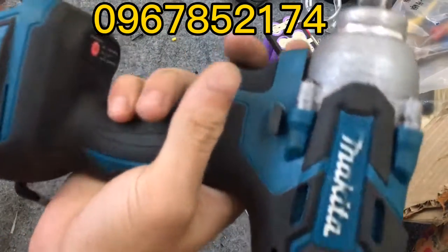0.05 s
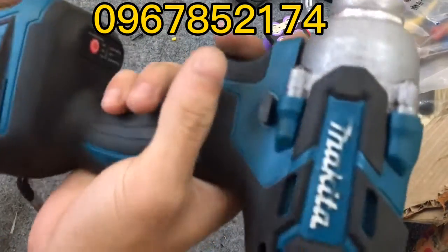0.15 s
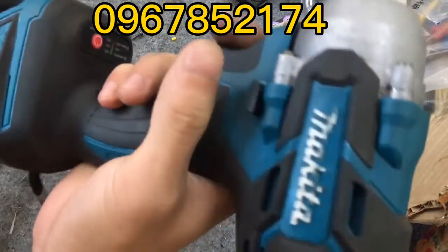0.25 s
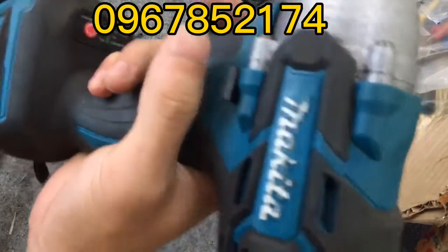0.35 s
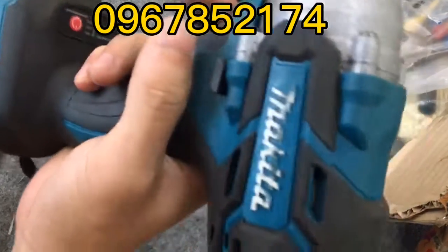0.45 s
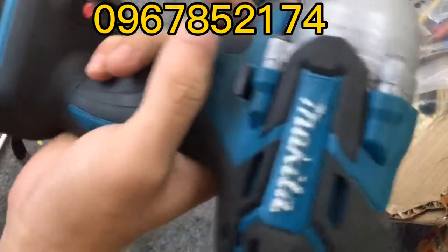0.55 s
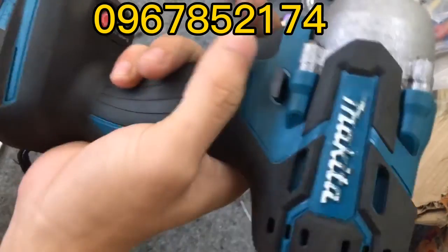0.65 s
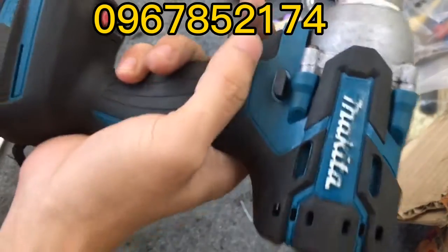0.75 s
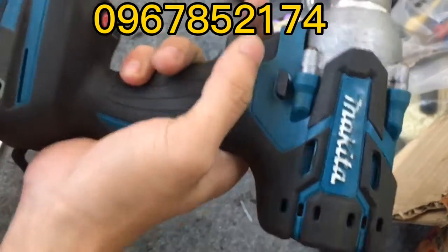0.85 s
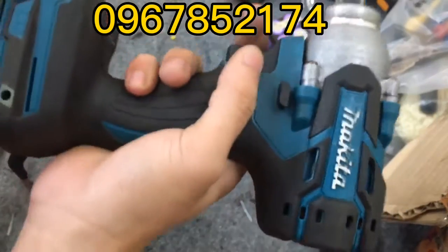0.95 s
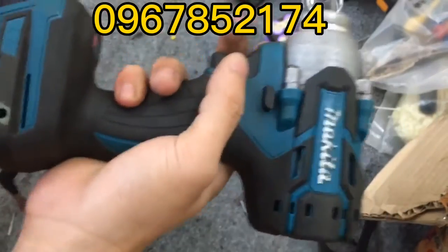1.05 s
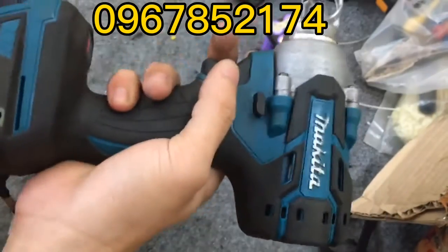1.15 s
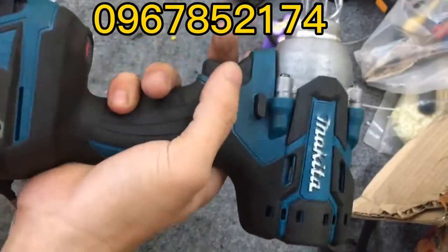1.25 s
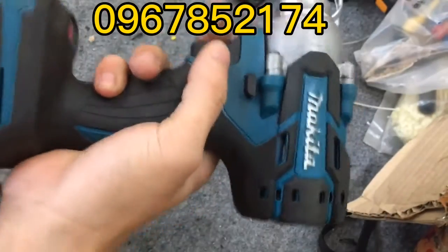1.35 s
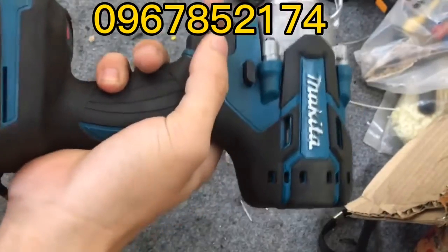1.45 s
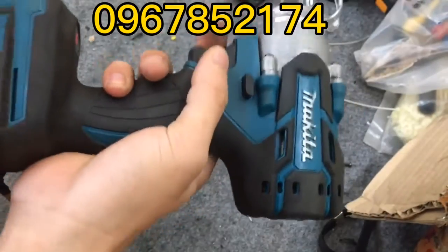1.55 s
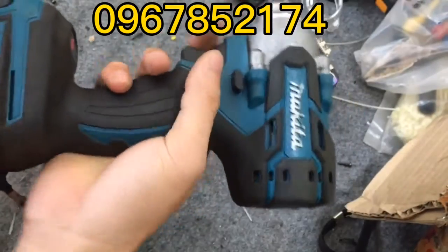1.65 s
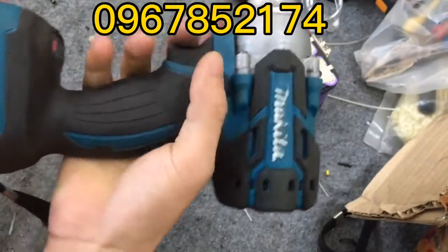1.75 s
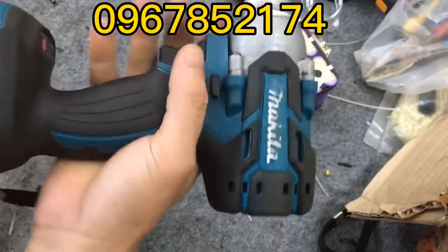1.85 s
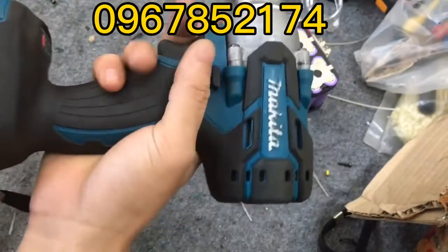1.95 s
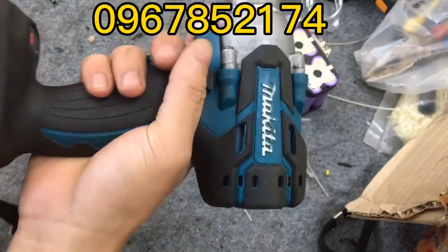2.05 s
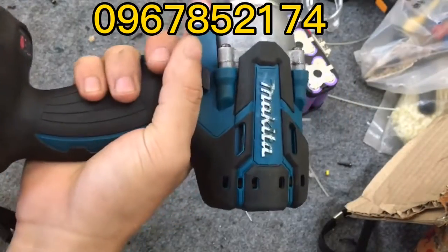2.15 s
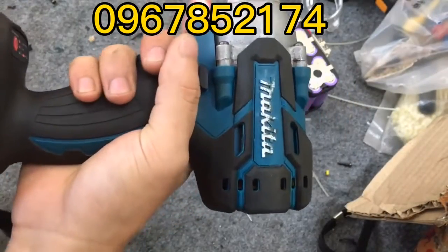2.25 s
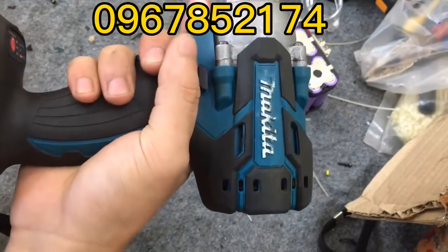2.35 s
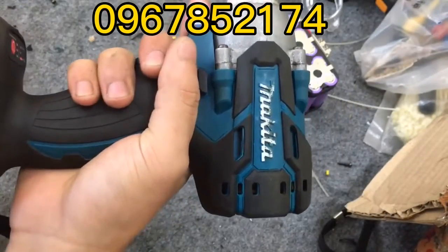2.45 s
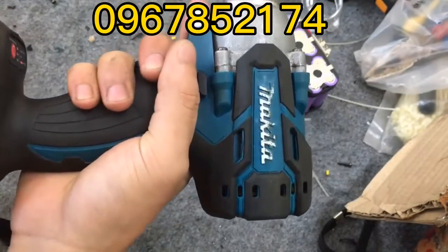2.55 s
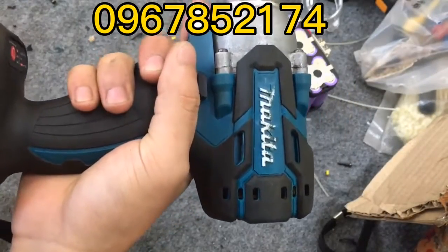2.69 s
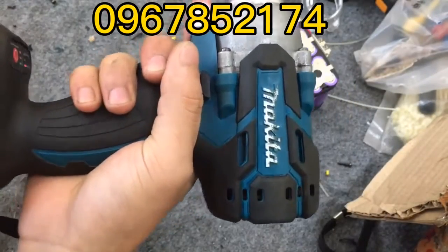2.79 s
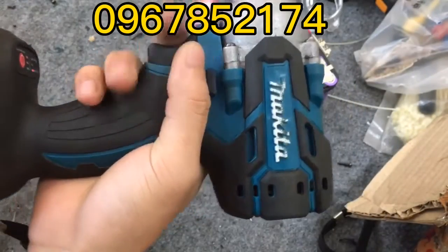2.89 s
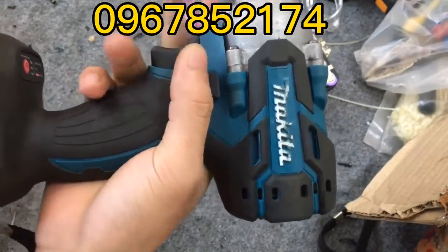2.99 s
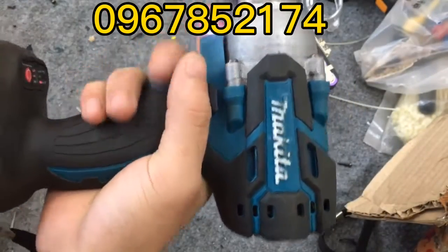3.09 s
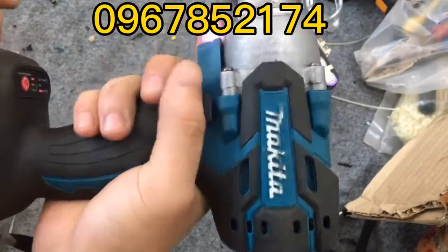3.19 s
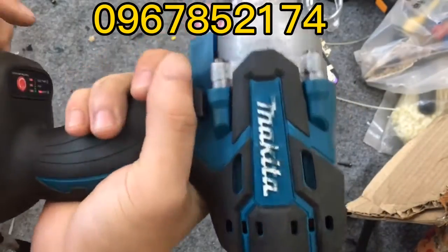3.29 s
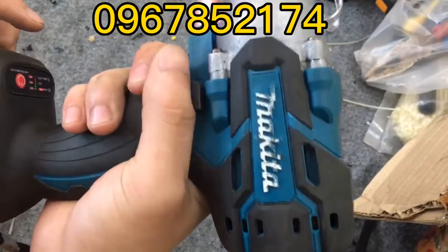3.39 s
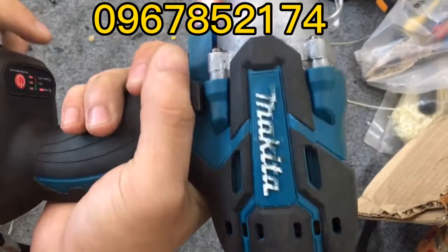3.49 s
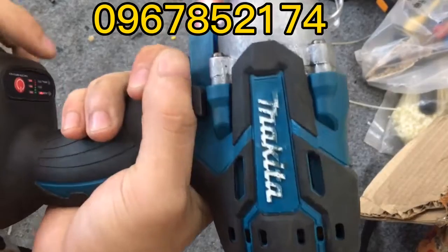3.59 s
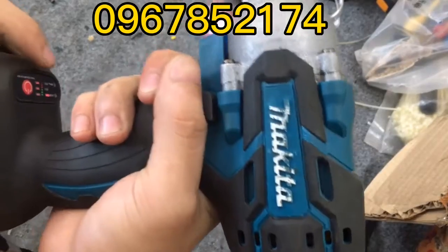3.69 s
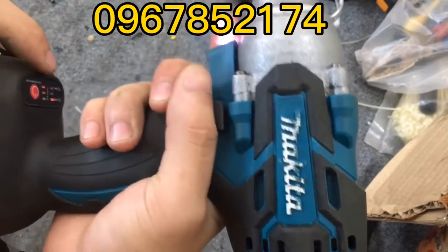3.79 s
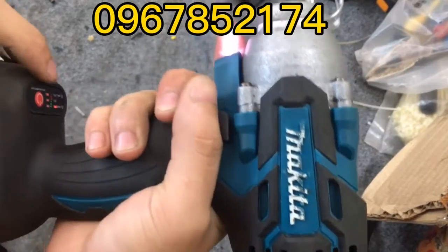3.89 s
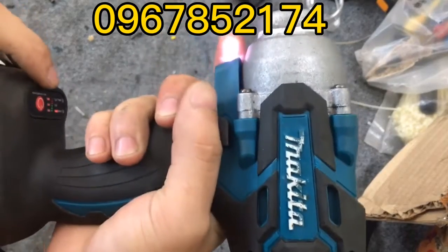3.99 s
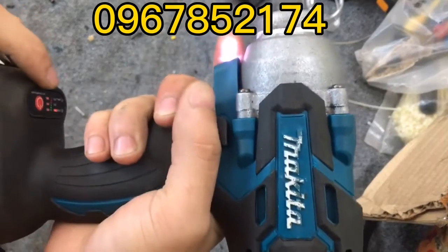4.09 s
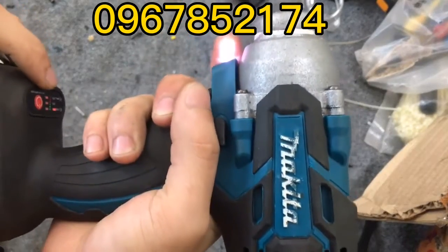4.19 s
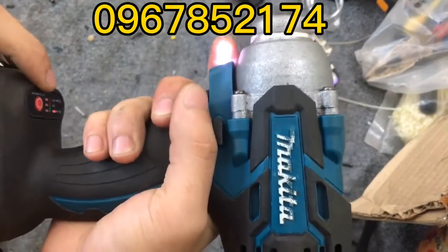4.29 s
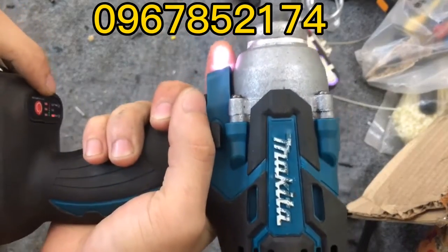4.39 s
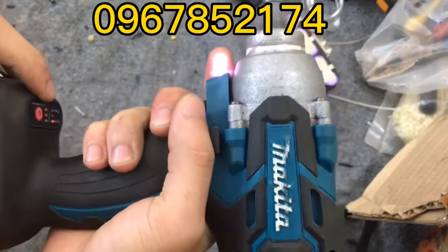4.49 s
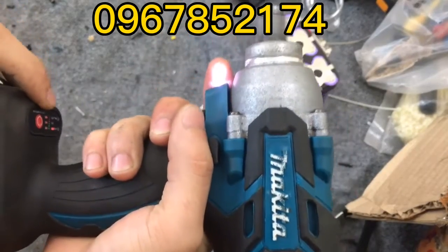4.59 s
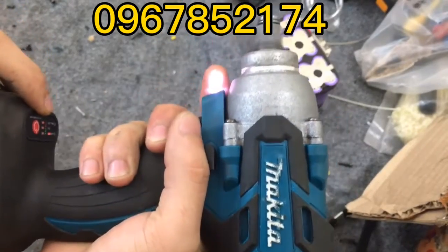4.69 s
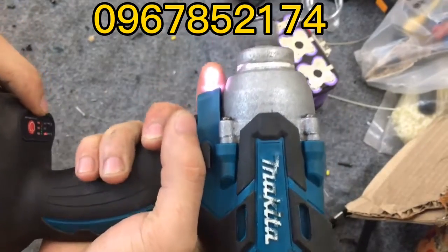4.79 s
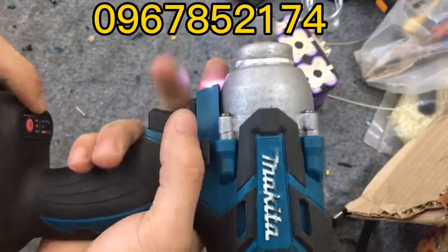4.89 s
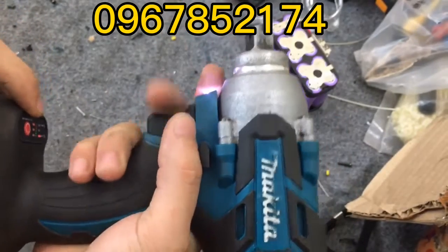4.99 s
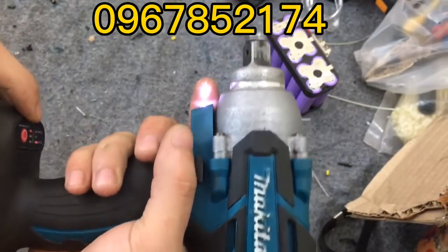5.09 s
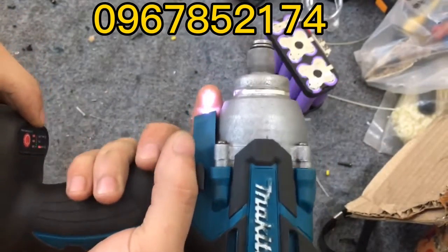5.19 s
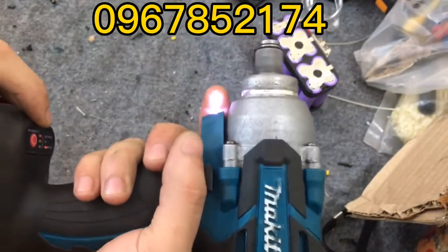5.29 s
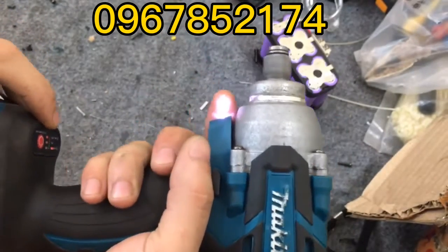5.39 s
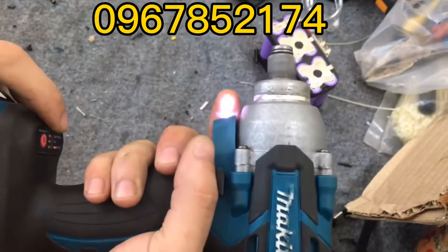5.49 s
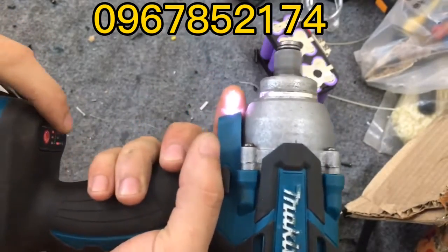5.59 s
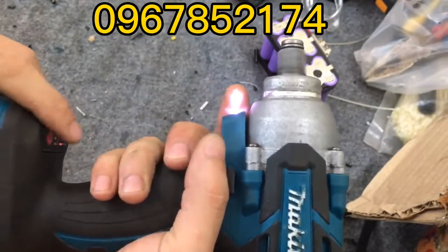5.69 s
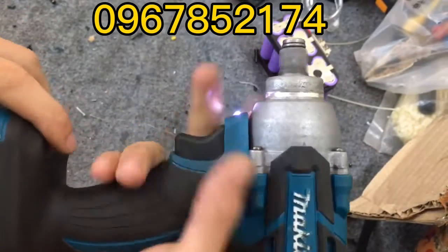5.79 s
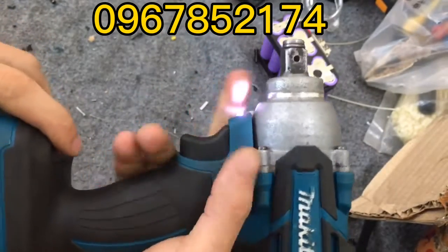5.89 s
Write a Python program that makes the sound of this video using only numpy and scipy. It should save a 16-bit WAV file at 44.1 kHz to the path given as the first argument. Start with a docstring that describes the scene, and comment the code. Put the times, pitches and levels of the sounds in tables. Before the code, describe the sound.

A close, centred take of a cordless impact wrench in a workshop, over low hum, rumble and soft hiss. From 0.42 to 0.61 s a rapid cluster of hard plastic snaps rings briefly in the housing, with small brushes and a bump. A louder, tight burst of snaps comes at 1.34-1.36 s, with faint ticks near 1.5 s. From 1.55 s the hand shifts on the grip with dull low thumps. The trigger runs the tool unloaded from 2.14 to 2.96 s, 3.14 to 4.95 s and 5.10 to 5.84 s. Each run begins with quick electric chirps and small clacks, reaches speed in about a tenth of a second, and holds a bright, slightly wavering whine around 2.3 kHz and higher, with rushing fan air and grainy gear rattle. Pitch then drops, the brake chirps, and a loud metallic clack ends it, with slight room tail. A faint click follows at 5.94 s.

```python
"""Cordless impact wrench in a workshop

A hand-held wrench, close up: its direction switch snaps over, then the trigger runs it three times unloaded.
Each run is a chirp of starting current, a whine over fan air and gear rattle, and a braked stop with a clack.
Sines locked to one shaft speed make the whine, filtered noise the air, and random knocks on ringing modes
the rattle. Clicks are noise cracks with a shell ring; hand noises, hum, rumble and hiss lie underneath."""
import sys
import numpy as np
from scipy import signal
from scipy.fft import rfft, irfft
from scipy.io import wavfile
from scipy.ndimage import uniform_filter1d, minimum_filter1d

SR = 44100
rng = np.random.default_rng(int(sys.argv[2]) if len(sys.argv) > 2 else 0)


def wav_record(signal):
    """Record a signal, one row per channel, as 16-bit PCM in the file named by sys.argv[1]."""
    frames = np.transpose(np.atleast_2d(signal))
    bounded = np.clip(frames, -1, 1)
    # unit amplitude maps onto the largest positive 16-bit level
    quanta = np.round(bounded * 32767).astype(np.int16)
    wavfile.write(sys.argv[1], SR, quanta)


N = 262218
TIME = np.arange(N) / SR

# workshop background over time: start_s, low_hum_db, high_hum_db, hiss_and_rumble_db
BACKGROUND = [(0, -46, -41, -35.5), (.5, -41.5, -42.5, -41), (1.2, -41.5, -50.5, -39), (1.9, -49, -54, -40),
              (3.2, -54.5, -44.5, -41), (5.9, -52, -54, -48)]
# the low and the high hum line: pitch_hz
HUM_HZ = (104.8, 164)
# relative spectrum of the rumble and hiss: frequency_hz, density_db (per Hz)
FLOOR_SPECTRUM = [(20, -30), (35, -25), (55, -2.5), (100, -10), (220, -13), (400, -14), (900, -20.5),
                  (2200, -22.5), (5000, -31), (10000, -39), (16000, -45)]
# decay of the room by band: frequency_hz, t60_s
ROOM_T60 = [(100, 0.12), (600, 0.93), (2200, 0.68), (6000, 1), (15000, 0.34)]
# relative spectrum of the room tail at its start: frequency_hz, level_db
ROOM_COLOUR = [(200, -0.5), (600, -7), (870, -1.5), (1300, -2.5), (2100, 1), (4500, -8), (7000, -8.5),
               (15000, -8)]
# relative spectrum of the hand shifting on the grip: frequency_hz, density_db (per Hz)
GRIP_SPECTRUM = [(15, -22), (35, -2), (55, 2.5), (120, -9.5), (200, -5), (400, -16), (1500, -62)]
# a low thud as the switch snaps over (first row), then the hand bumping the grip, levels before a common trim:
# start_s, level_db, centre_hz, length_s
BUMPS = [(.56, -17.5, 230, 0.017), (1.565, -22, 77.4, 0.066), (1.665, -23.5, 150, 0.022),
         (1.968, -15, 221, 0.041), (1.975, -19.5, 75.5, 0.088), (2.68, -22, 84, 0.074),
         (2.86, -21.5, 64.3, 0.081), (3.505, -19, 69, 0.034), (4.095, -18, 130, 0.043), (5, -29, 102, 0.1)]
# fingers and switch sliding on the housing, levels before a common trim: start_s, level_db, centre_hz, length_s
BRUSHES = [(0, -53, 12000, .19), (.367, -32, 13500, .011), (.527, -28, 670, .03), (.527, -34, 3000, .035),
           (.95, -45.5, 9300, .11), (1.95, -52, 8300, .085)]
# snaps of switch and trigger: start_s, level_db, shell_ring_db, tilt_db_per_octave, shell_pitch_ratio
SNAPS = [(0.423, -5.5, 11, -1, 1.07), (.4305, -9, 10, -0.5, 1.23), (.441, -12.5, 8, -7.5, 1.07),
         (.4775, -6, 11, 2, 1.03), (.525, -18, 5, -11, 1.2), (.537, -16.5, 15, -3.5, 1.05),
         (.546, -13, -5, -5.5, 0.83), (.5645, -5, 9.5, 0, 1), (.613, -31, -7, -7, 1),
         (1.3393, 0, 4.5, -1.5, .94), (1.3438, -0.5, 9.5, -4, 1), (1.3573, 1.5, 1, -0.5, 0.966),
         (1.3608, -4, 4, -0.5, 1.04), (1.509, -18, -12, -0.5, 0.83), (1.527, -17, -15, -0.5, 0.38),
         (5.941, -17.5, -15, 1, 0.79)]
# relative spectrum of a crack: frequency_hz, density_db (per Hz)
CRACK_SPECTRUM = [(120, -40), (200, -11), (380, -16.5), (620, -10), (900, -6), (1250, -2.5), (1600, -6.5),
                  (2200, -5), (3000, -6.5), (4500, -10), (6800, -10), (16000, -22)]
# ringing modes of the plastic shell: frequency_hz, relative_level_db, t60_s
SHELL_MODES = [(615, -4.5, 0.032), (701, -9, 0.028), (1330, -14, 0.022), (1920, -18, 0.012),
               (2300, -18, 0.024)]
# hammer clacks as each run catches: after_start_s, level_db
CATCH_CLACKS = [(0.0232, -11), (0.0447, -4.5)]
# stator chirps as current surges at each start: after_start_s, level_db, length_s, first_hz, last_hz
START_CHIRPS = [(0, 0, .011, 2270, 2250), (.0135, -14.5, .023, 2080, 2340), (.037, -15, .012, 2030, 2330),
                (.0495, -11.5, .016, 2060, 2390)]
# stator chirps as the brake bites: before_standstill_s, level_db, length_s, first_hz, last_hz
BRAKE_CHIRPS = [(.048, -11.5, .012, 2080, 1800), (.039, -16, .014, 1800, 1550),
                (.016, -12.5, .011, 2350, 2120)]
# main and side tones of a chirp: pitch_ratio, level_db
CHIRP_TONES = [(1, 0), (1.63, -21), (.73, -21), (3.06, -36)]
# ringing modes of the gear case: frequency_hz, width_hz, relative_level_db
GEAR_CASE_MODES = [(3122, 99, -4), (3378, 290, 3), (3800, 100, -14), (1310, 390, -16.5)]
# relative spectrum of the fan air: frequency_hz, density_db (per Hz)
AIR_SPECTRUM = [(150, -21.5), (400, -4.5), (800, -7), (1250, 6), (1900, 3.5), (2700, 2.5), (3900, 7),
                (5200, -1.5), (7200, 4), (8300, -3.5), (9400, 3.5), (10300, -5), (13000, -8), (16000, -11)]
# pulls of the trigger: start_s, standstill_s, free_shaft_speed_hz, creep_hz_per_s
RUNS = [(2.135, 2.9645, 277.2, 9.8), (3.14, 4.9505, 284.8, 2.6), (5.103, 5.837, 288.5, 0.5)]
# balance of each run before the part trims:
# air_db, rattle_db, mesh_db, stator_octave_db, blade_octave_db, overtones_db
RUN_LEVELS = [(-20.5, -18.5, -21, -39, -30.5, -17.5), (-18.5, -19.5, -25.5, -26.5, -28.5, -19),
              (-20, -18.5, -28.5, -36, -34, -21)]
# main tones swelling as the tool moves in the hand, one table a run, before trims:
# start_s, stator_whine_db, fan_blade_db
SINGING = [
    [(2.27, -21, -36), (2.284, -17, -27), (2.404, -23, -26), (2.456, -16, -28), (2.54, -25, -22.5),
     (2.738, -33, -24), (2.788, -22.5, -23), (2.84, -18.5, -28)],
    [(3.27, -14, -22), (3.316, -15, -21), (3.652, -15.5, -17.5), (3.938, -25, -18.5), (4.516, -18.5, -23),
     (4.546, -26.5, -21), (4.676, -20, -21.5), (4.83, -21.5, -31)],
    [(5.23, -15.5, -34), (5.248, -14.5, -36), (5.28, -24, -32), (5.45, -21.5, -20), (5.498, -18, -28),
     (5.628, -22.5, -23), (5.682, -19.5, -20), (5.71, -19, -23)],
]
# the beating pair of gear mesh tones, twin then main: multiple_of_shaft_speed
MESH_ORDERS = (12, 12.15)
# weaker tones of rotor, fan and bearings: multiple_of_shaft_speed
OVERTONES = (1, 2, 4, 6.26, 18.42, 20, 24, 28, 34.3, 46.35)
# their balance: relative_level_db
OVERTONES_DB = (-12.5, -27.5, -20.5, -20, -19, -8.5, -17, -31, -36, -38)

STATOR_ORDER, BLADE_ORDER = 8, 13  # multiples of shaft speed
STATOR_GROWTH = 3.5  # exponent of gain against speed
# spin-up: steady acceleration to a share of the free speed, then a gradual approach to the rest
RAMP_S, RAMP_SHARE, SETTLE_S = .099, .85, .031
# spin-down: coast, then brake; both times count back from standstill, and the brake adds to the coast
COAST_S, COAST_HZ_PER_S, BRAKE_S, BRAKE_HZ_PER_S = .114, 600, .042, 3600
AIR_AT_REST_DB, AIR_SWELL_DB = -7.5, 3  # offset towards zero speed; growth over a run
RATTLE_AT_REST_DB, RATTLE_SWELL_DB = -7, 1.5
COAST_RATTLE_DB = 3  # gears rattle more once unpowered
STOP_CLACK_DB = -1
CLACK_RING_DB, CLACK_TILT_DB, CLACK_ROOM_DB = -12.5, 2.5, -12.5  # metal: little ring, bright (dB per octave)
SNAP_ROOM_DB, WRENCH_ROOM_DB = -12.5, -21.5
GRIP_FROM_S = 1.55  # the hand closes round the grip and keeps shifting
CEILING_DB, EDGE_HZ = -1.0, 16050


def amp(db):
    """Decibels to gain."""
    return 10 ** (np.asarray(db) / 20)


def unit(x):
    """Scales to rms 1."""
    return x / np.sqrt(np.mean(x ** 2) + 1e-20)


def read(points, hz):
    """Reads a spectrum on a log-frequency axis."""
    f, value = np.transpose(points)
    return np.interp(np.log(hz + 1), np.log(f + 1), value)


def add(mix, s, sound):
    """Mixes a sound in at time s."""
    part = mix[max(round(s * SR), 0):][:len(sound)]
    part += sound[:len(part)]


def colour(x, points, tilt_db=0):
    """Filters by a spectrum, tilted in dB per octave about the middle treble."""
    hz = np.fft.rfftfreq(len(x), 1 / SR)
    tilt = tilt_db * np.log2((hz + 200) / 4000)
    return irfft(rfft(x) * amp(read(points, hz) + tilt), len(x))


def drift(hz):
    """Slow random wander of about rms 1, rolled off above the given rate."""
    coarse = TIME[::32]
    f = np.fft.rfftfreq(len(coarse), coarse[1])
    slow = irfft(rfft(rng.standard_normal(len(coarse))) / (1 + (f / hz) ** 4), len(coarse))
    return np.interp(TIME, coarse, unit(slow))


def workshop(hum_waver_db=2):
    """Shaped noise for rumble and hiss, under two hum lines that waver in level and phase."""
    s, *hum_db, floor_db = np.transpose(BACKGROUND)
    hum = np.zeros(N)
    for hz, db in zip(HUM_HZ, hum_db):
        level = amp(np.interp(TIME, s, db) + hum_waver_db * drift(2.0))
        hum += level * np.sqrt(2) * np.sin(2 * np.pi * hz * TIME + 0.11 * drift(5.7))
    floor = unit(colour(rng.standard_normal(N), FLOOR_SPECTRUM))
    return hum + amp(np.interp(TIME, s, floor_db)) * floor


def room(x):
    """A diffuse noise tail, each band dying at its own speed."""
    hz, t, z = signal.stft(rng.standard_normal(SR), SR, nperseg=256)
    decay_db = read(ROOM_COLOUR, hz)[:, None] - 60 * t / read(ROOM_T60, hz)[:, None]
    tail = signal.istft(z * amp(decay_db), SR, nperseg=256)[1]
    tail *= np.minimum(np.arange(len(tail)) / SR / 0.00067, 1)  # soft onset
    return signal.fftconvolve(x, tail / np.linalg.norm(tail))[:N]


def grip(rumble_db=-46, lumpy_db=6, shifts_hz=9):
    """Small shifts of the hand: a low rumble in irregular lumps."""
    lumps = colour(rng.standard_normal(N), GRIP_SPECTRUM) * amp(lumpy_db * np.minimum(drift(shifts_hz), 2))
    held = uniform_filter1d(1. * (TIME > GRIP_FROM_S), size=2000)
    return amp(rumble_db) * unit(lumps) * held


def handling(rows, gain_db):
    """Skin and housing in contact, and the thud of the switch: soft swells of noise banded about a centre."""
    out = np.zeros(N)
    for s, db, hz, length in rows:
        band = [(hz / 4, -40), (hz * .75, 0), (hz * 1.25, 0), (hz * 8, -90)]
        noise = colour(rng.standard_normal(SR), band)
        swell = np.hanning(int(length * SR))
        add(out, s, amp(db + gain_db) * unit(noise[:len(swell)] * swell))
    return out


def blows():
    """Snaps and hammer clacks as rows: the columns of SNAPS, then room_db."""
    clacks = [(start + after, db) for start, *_ in RUNS for after, db in CATCH_CLACKS]
    clacks += [(stop, STOP_CLACK_DB) for _, stop, *_ in RUNS]
    rows = [(*row, SNAP_ROOM_DB) for row in SNAPS]
    return rows + [(*row, CLACK_RING_DB, CLACK_TILT_DB, 1, CLACK_ROOM_DB) for row in clacks]


def shell_ring(t, pitch, rise_s=0.0017):
    """Decaying modes of the struck shell, each slightly detuned at random."""
    ring = np.zeros(len(t))
    for hz, mode_db, t60 in SHELL_MODES:
        mode_hz = hz * pitch * (1 + 0.0079 * rng.standard_normal())
        ring += amp(mode_db - 60 * t / t60) * np.sin(2 * np.pi * mode_hz * t) * rng.choice([-1, 1])
    return .5 * ring * (1 - np.exp(-t / rise_s))


def clicks(crack_s=0.0019, buzz_s=0.01, buzz_db=-12, crack_db=-6, ring_feed=0.61):
    """A sharp crack, a short buzz and the ring of the shell; returns direct sound and room feed."""
    direct, feed, t = np.zeros(N), np.zeros(N), np.arange(4096) / SR
    for s, db, ring_db, tilt_db, pitch, room_db in blows():
        noise = unit(colour(rng.standard_normal(len(t)), CRACK_SPECTRUM, tilt_db))
        crack = amp(crack_db) * noise * (np.exp(-t / crack_s) + amp(buzz_db) * np.exp(-t / buzz_s))
        ring = amp(ring_db) * shell_ring(t, pitch)
        add(direct, s, amp(db) * (crack + ring))
        add(feed, s, amp(db + room_db) * (crack + ring_feed * ring))
    return direct, feed


def chirp(db, length, first_hz, last_hz, grit_db=-25):
    """One surge of current swells and fades in the stator, with a scrape of the gears."""
    hz = np.linspace(first_hz, last_hz, int(length * SR))
    phase = 2 * np.pi * np.cumsum(hz) / SR
    ring = sum(amp(side_db) * np.sin(ratio * phase) for ratio, side_db in CHIRP_TONES)
    grit = amp(grit_db) * unit(colour(rng.standard_normal(4096), AIR_SPECTRUM))[:len(hz)]
    swell = np.sin(np.linspace(0, np.pi, len(hz)))
    return amp(db) * swell * (ring + grit)


def chirps():
    """Every run starts and brakes with the same series of current surges."""
    out = np.zeros(N)
    for start, stop, _, _ in RUNS:
        for after, *shape in START_CHIRPS:
            add(out, start + after, chirp(*shape))
        for before, *shape in BRAKE_CHIRPS:
            add(out, stop - before, chirp(*shape))
    return out


def shaft_speed(start, stop, free_hz, creep):
    """Turns per second through one run: ramp, settle, coast, brake."""
    t, left = np.maximum(TIME - start, 0), stop - TIME
    settled = 1 - np.exp(-np.maximum(t - RAMP_S, 0) / SETTLE_S)
    share = RAMP_SHARE * np.minimum(t / RAMP_S, 1) + (1 - RAMP_SHARE) * settled
    lost = COAST_HZ_PER_S * np.maximum(COAST_S - left, 0) + BRAKE_HZ_PER_S * np.maximum(BRAKE_S - left, 0)
    return np.maximum((free_hz + creep * t) * share - lost, 0)


def controls(lag_s=0.012, blade_growth=4.5, mesh_growth=4.9, octave_growth=3.4, octave_swell_db=3,
             unpowered_db=-13):
    """Shaft speed and the gains that follow it: air, rattle, mesh, stator, blades, their octaves, overtones."""
    total = np.zeros((9, N))
    for run, levels, singing in zip(RUNS, RUN_LEVELS, SINGING):
        start, stop = run[:2]
        air_db, rattle_db, mesh_db, stator_octave_db, blade_octave_db, overtones_db = levels
        speed = shaft_speed(*run)
        turning = (TIME > start + lag_s) & (TIME < stop)
        t, pace = TIME[turning], speed[turning] / speed.max()
        progress = (t - start) / (stop - start) - .5  # from -.5 to .5 over the run
        slowness = 1 - pace ** 2
        coasting = t > stop - COAST_S
        unbraked = coasting & (t < stop - BRAKE_S)
        power_db = unpowered_db * coasting
        s, stator_db, blade_db = np.transpose(singing)
        rattle_db = rattle_db + RATTLE_AT_REST_DB * slowness + RATTLE_SWELL_DB * progress
        total[0] += speed
        total[1:, turning] += [
            amp(air_db + AIR_AT_REST_DB * slowness + AIR_SWELL_DB * progress),
            amp(rattle_db + COAST_RATTLE_DB * unbraked),
            amp(mesh_db + power_db) * pace ** mesh_growth,
            amp(np.interp(t, s, stator_db) + power_db) * pace ** STATOR_GROWTH,
            amp(np.interp(t, s, blade_db)) * pace ** blade_growth,
            amp(stator_octave_db + power_db) * pace ** (2 * STATOR_GROWTH),
            amp(blade_octave_db + octave_swell_db * progress) * pace ** octave_growth,
            amp(overtones_db) * pace]
    return uniform_filter1d(total, size=300, axis=1)  # rounds off the jumps


def gears(turns, rattle_db=-4, knocks_per_s=1800):
    """Loose teeth knock the gear case, swelling twice in each turn of the hammer."""
    hammer = 2 * np.pi * turns / 8.1  # the hammer turns slower than the shaft
    size = amp(4 * rng.uniform(-1, 1, N) + 3 * np.sin(2 * hammer) + 1.5 * np.sin(hammer))
    knocks = size * rng.choice([-1, 1], N) * (rng.random(N) < knocks_per_s / SR)
    t = np.arange(2048) / SR
    ring = np.zeros(len(t))
    for k, (hz, width, db) in enumerate(GEAR_CASE_MODES):
        ring += amp(db) * np.exp(-np.pi * width * t) * np.sin(2 * np.pi * hz * t) * (-1) ** k
    return amp(rattle_db) * unit(signal.oaconvolve(knocks, ring)[:N])


def fan(turns, air_db=1.5, throb=0.077, flutter_db=0.7):
    """Air through the vents, pulsing with each turn."""
    air = unit(colour(rng.standard_normal(N), AIR_SPECTRUM))
    pulse = 1 + throb * np.sin(2 * np.pi * turns)
    return amp(air_db) * air * pulse * amp(flutter_db * drift(82))


def motor(waver_db=0.5, turning_db=4.0, jitter=0.00031, blade_db=-1, twin_db=-2, overtone_growth=0.49):
    """Tones locked to the turning shaft, the rush of the fan and the rattling gears."""
    speed, rush, rattle, mesh, stator, blades, stator_octave, blade_octave, overtones = controls()
    turns = np.cumsum(speed * (1 + jitter * drift(31))) / SR

    def tone(order, depth_db):
        """A sine at a multiple of shaft speed, wavering in level."""
        return np.sqrt(2) * np.sin(2 * np.pi * (order * turns + rng.random())) * amp(depth_db * drift(33))

    whine, pace = np.zeros(N), np.abs(speed) / speed.max()
    for k, db in zip(OVERTONES, OVERTONES_DB):
        growth = pace ** (overtone_growth + 3 / k)  # low tones only radiate near full speed
        beamed = min(k / STATOR_ORDER, 1)  # high tones waver more as the hand moves
        level = overtones * growth * amp(db + turning_db * beamed * drift(0.5))
        whine += level * tone(k, waver_db * beamed)
    whine += stator * tone(STATOR_ORDER, 1.0) + stator_octave * tone(2 * STATOR_ORDER, waver_db)
    whine += amp(blade_db) * blades * tone(BLADE_ORDER, 0.98)
    whine += blade_octave * tone(2 * BLADE_ORDER, waver_db)
    twin, main = MESH_ORDERS  # a close pair that beats roughly
    whine += mesh * (tone(main, waver_db) + amp(twin_db) * tone(twin, waver_db))
    return whine + rush * fan(turns) + rattle * gears(turns)


def scene():
    """The wrench close by and the workshop around it, the same in both channels."""
    wrench = motor() + chirps()
    snaps, feed = clicks()
    reverb = room(feed + amp(WRENCH_ROOM_DB) * wrench)
    hand = handling(BUMPS, gain_db=-12.0) + handling(BRUSHES, gain_db=-1.5) + grip()
    mix = workshop() + hand + reverb + snaps + wrench
    return np.array([mix, mix])


def record(dry):
    """A fast limiter holds the peaks near full scale; then a low-pass cuts the top of the band."""
    gain = np.minimum(1, amp(CEILING_DB) / (np.abs(dry).max(axis=0) + 1e-9))
    gain = uniform_filter1d(minimum_filter1d(gain, size=45), size=45)
    low_pass = signal.firwin(401, EDGE_HZ, window=("kaiser", 9), fs=SR)
    return signal.oaconvolve(dry * gain, low_pass[None], "same", axes=1)


dry = scene()
out = record(dry)
wav_record(out)
```